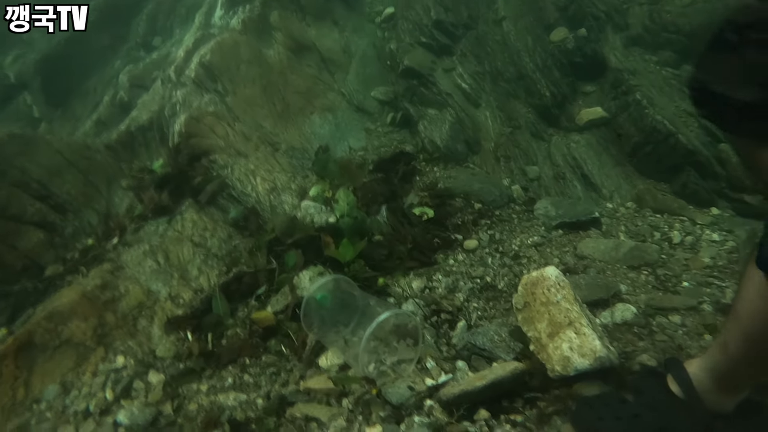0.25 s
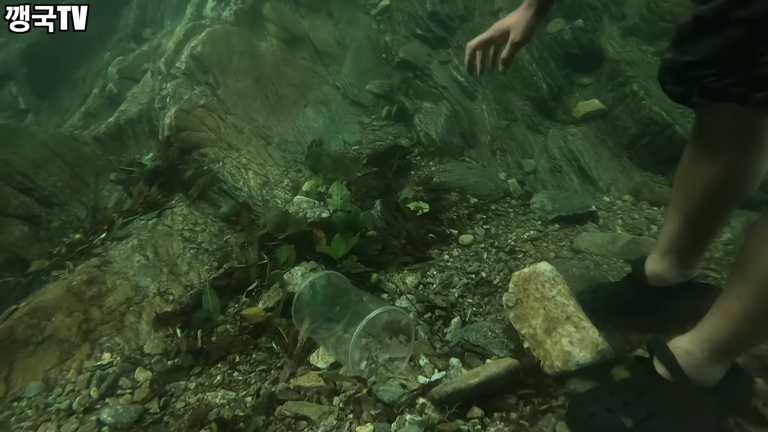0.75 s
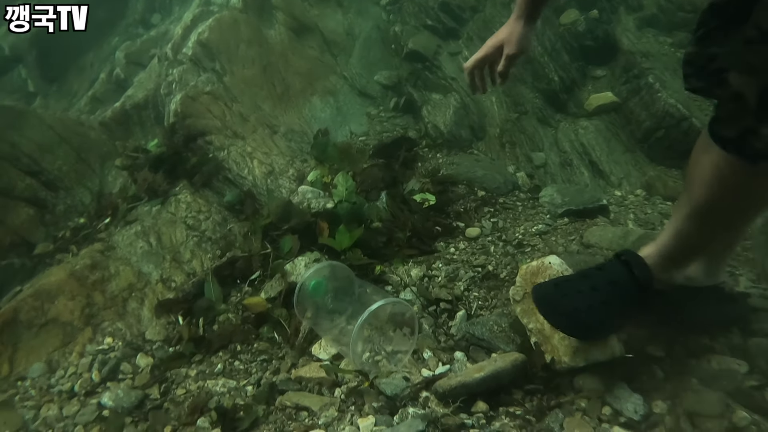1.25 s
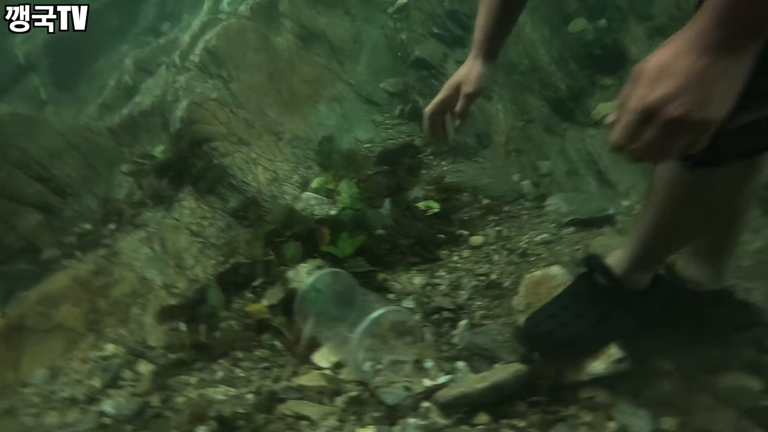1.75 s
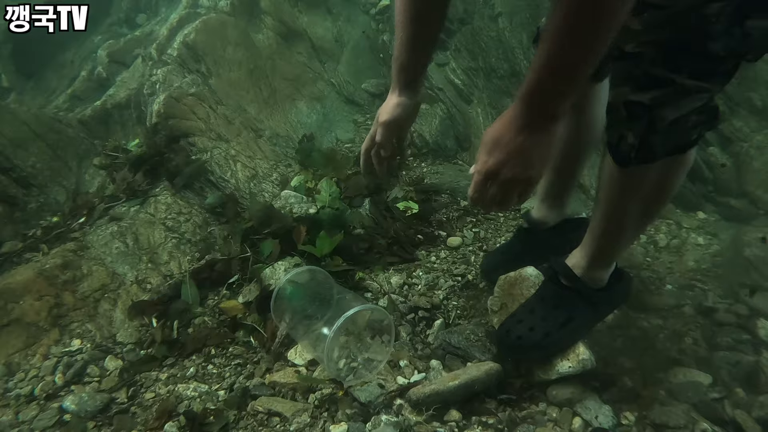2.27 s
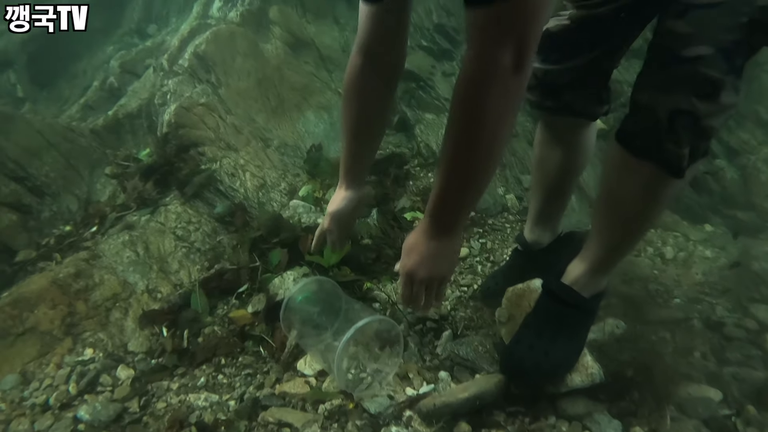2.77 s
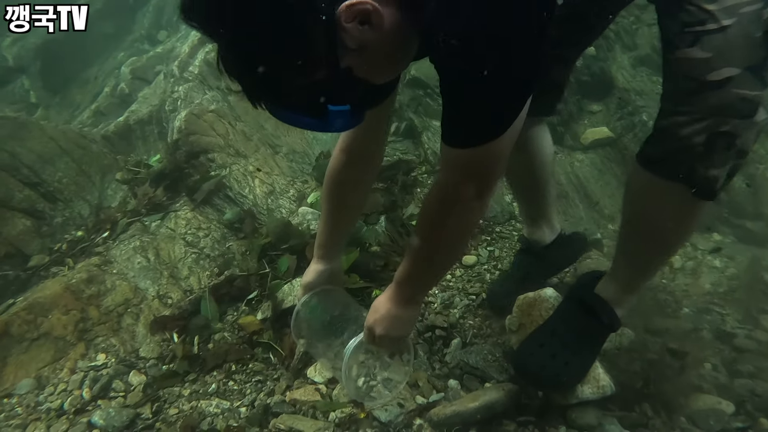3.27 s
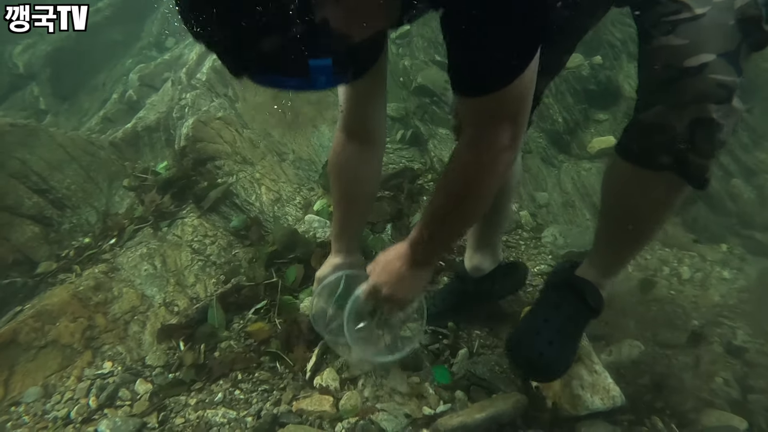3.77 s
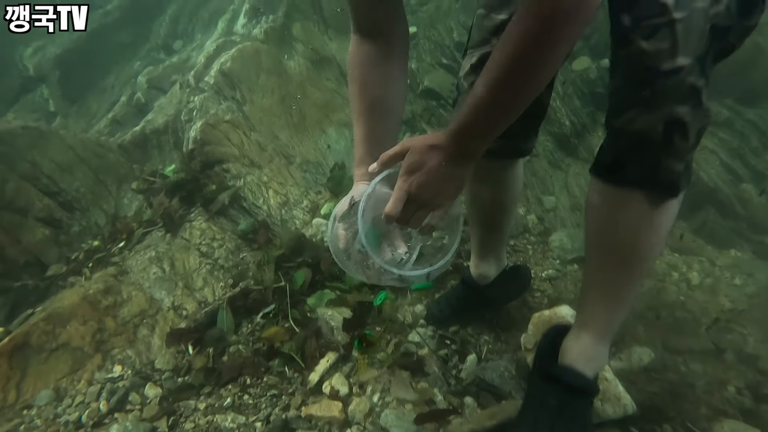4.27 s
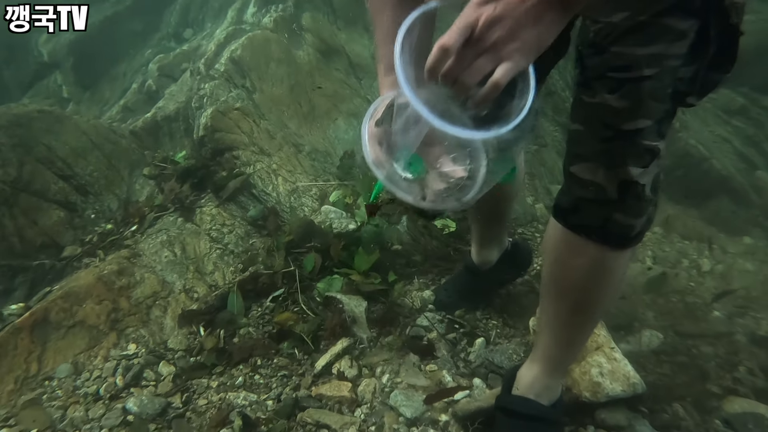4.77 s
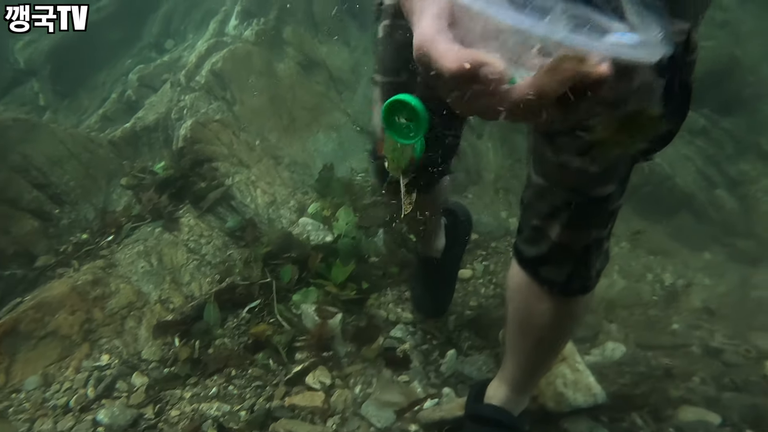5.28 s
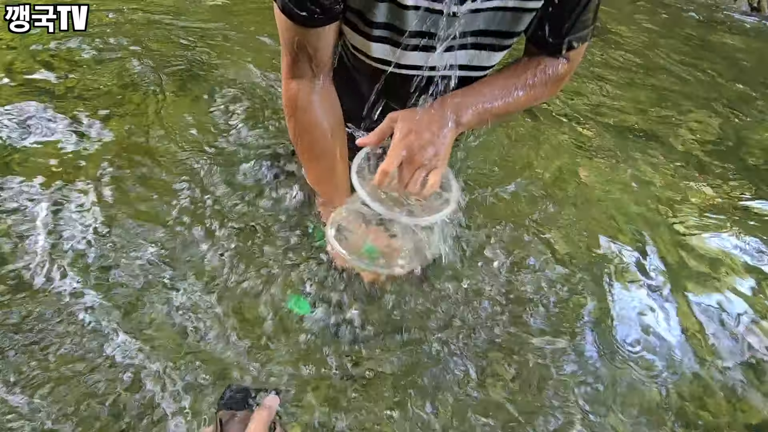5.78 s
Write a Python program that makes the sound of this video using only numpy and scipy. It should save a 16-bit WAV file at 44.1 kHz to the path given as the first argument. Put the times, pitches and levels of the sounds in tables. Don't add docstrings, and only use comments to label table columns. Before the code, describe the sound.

Muffled underwater stone clacks, gravel scrapes and low current rumble, then bubbles gush from a lifted plastic jar before an abrupt cut to bright stream rush.

```python
import sys
import numpy as np
from scipy import signal
from scipy.fft import rfft, irfft, next_fast_len
from scipy.io import wavfile
from scipy.ndimage import uniform_filter1d

SR = 44100
rng = np.random.default_rng(int(sys.argv[2]) if len(sys.argv) > 2 else 0)


def nominal_scale(level):
    x = np.asarray(level, float) / 20
    return 10 ** x


def log_audio(samples):
    frames = np.atleast_2d(samples).T
    limited = np.clip(frames, -1, 1)
    pcm = np.round(limited * 32767).astype(np.int16)
    wavfile.write(sys.argv[1], SR, pcm)


N = 265878
TIME_S = np.arange(N) / SR
SURFACE_S = 5.818


def unit(x):
    return x / np.sqrt(np.mean(x ** 2))


def butter(x, order, edge_hz, kind):
    return signal.sosfilt(signal.butter(order, edge_hz, kind, fs=SR, output="sos"), x)


def walk(rate_hz):
    k = int(SR / rate_hz)
    held = np.repeat(rng.standard_normal(N // k + 1), k)
    return unit(uniform_filter1d(uniform_filter1d(held, k), k)[:N])


def coloured(points, channels):
    size = next_fast_len(N)
    hz, db = np.transpose(points)
    gain = nominal_scale(np.interp(np.log(np.fft.rfftfreq(size, 1 / SR) + 1), np.log(hz), db))
    return unit(irfft(rfft(rng.standard_normal((channels, size))) * gain, size)[:, :N])


def case_response(hz):
    # centre_hz, width_hz, left_db, right_db
    modes = [(88.5, 40, -7.5, -13.5), (165.3, 81, -4.5, -3.5), (321.3, 205, -7, -9), (403.5, 41.3, 5.5, 3),
             (500, 77.5, -2, -3), (798, 93, -43, -9.5), (960, 27, -59.5, -44.5), (1096, 98, -46, -13.5),
             (1260, 166, -13, -14.5), (1387, 82, -22.5, -33), (1570, 92, -15, -18), (1837, 148, -43, -21.5),
             (2007, 205, -25.5, -29), (2330, 540, -35.5, -27), (2946, 236, -29.5, -51.5),
             (3413, 980, -36.5, -29.5), (4120, 110, -45.5, -33.5), (4440, 326, -27, -26.5),
             (4860, 210, -29, -23.5), (5410, 765, -27, -27), (6387, 320, -39.5, -32),
             (6945, 360, -29.5, -33), (9480, 7500, -51.5, -58), (12600, 9500, -50, -54)]
    leads = [0, .05, .1, .15, -.6, -1.2, -.3, .7, .5, 0, -.8, -2.5, -.3, -.3, .6, -.8, .1, 0, 0, 0, 0, 0, 0,
             0]
    out = 0
    for k, ((centre, width, left_db, right_db), lead) in enumerate(zip(modes, leads)):
        peak = 1 / (1 + 1j * (hz / width - centre ** 2 / (hz * width)))
        ports = np.array([nominal_scale(left_db), nominal_scale(right_db) * np.exp(-1j * lead)])
        out = out + (-1) ** k * ports[:, None] * peak * peak
    return out


def through_case(x, lo_hz, hi_hz):
    taps = 8192
    hz = np.fft.rfftfreq(taps, 1 / SR) + 1
    band_pass = signal.butter(3, [lo_hz, hi_hz], "band", fs=SR, output="sos")
    band = signal.sosfreqz(band_pass, hz, fs=SR)[1]
    ring = irfft(band * case_response(hz), taps)
    heard = signal.oaconvolve(np.atleast_2d(x), ring, axes=1)[:, :N]
    return heard / np.abs(ring.mean(axis=0)).max()


def rattles(start_s, level_db):
    length = 300
    out = np.zeros(N + length)
    fade = 0.13 * np.exp(-np.arange(length) / (0.0036 * SR))
    for s, size in zip(start_s, nominal_scale(level_db)):
        rattle = fade * rng.standard_normal(length)
        rattle[0] = 1
        out[int(s * SR):int(s * SR) + length] += size * rattle
    return out[:N]


def pockets(rows, attack_cycles, ports, rise=0.069):
    out = np.zeros((2, N + SR))
    for (s, db, hz, t60, *own_rise), port in zip(rows, ports):
        t = np.arange(int(t60 * SR)) / SR
        shape = (1 - np.exp(-t * hz / attack_cycles)) * np.exp(-np.log(1000) * t / t60)
        cycles = hz * (t + (own_rise or [rise])[0] * t ** 2 / (2 * t60))
        wave = shape / shape.max() * np.exp(2j * np.pi * cycles)
        out[:, int(s * SR):int(s * SR) + len(t)] += nominal_scale(db) * np.imag(port[:, None] * wave)
    return out[:, :N]


def sunk_pockets(rows, attack_cycles):
    ports = case_response(np.array(rows)[:, 2])
    return pockets(rows, attack_cycles, (ports / np.sqrt(np.mean(np.abs(ports) ** 2, axis=0))).T)


def swarm(t0, t1, count, lo_hz, hi_hz, db, spread_db, cycles):
    when, pitch, size, ring = rng.random((count, 4)).T
    hz = lo_hz * (hi_hz / lo_hz) ** pitch
    size_db = db - spread_db * np.log(np.maximum(size, 0.06))
    return np.transpose([t0 + (t1 - t0) * when, size_db, hz, cycles * (0.5 + ring) / hz, 0.26 * ring])


def grainy(rate_hz, spread_db, share, flicker_db, own):
    size = nominal_scale(spread_db * np.minimum(rng.exponential(size=N), 2.5))
    knocks = (rng.random(N) < rate_hz / SR) * size * np.sign(rng.standard_normal(N))
    flow = rng.standard_normal(N) + own * rng.standard_normal((2, N))
    return unit(nominal_scale(flicker_db * walk(45)) * flow) + share * unit(knocks)


def clacks():
    # start_s, bright_db, middle_db, dull_db
    knocks = [(0.0312, -52, -27, -59), (.1226, -58, -50, -62), (0.173, -70, -44, -60),
              (0.2173, -54, -29, -47), (0.2632, -64.5, -28, -59), (0.448, -60, -50, -57),
              (0.5244, -37, -40, -57), (.617, -56.5, -45, -60), (0.659, -61, -31, -62),
              (0.685, -44, -17, -53), (0.7703, -57.5, -42, -55), (3.0593, -63, -38, -65),
              (3.2109, -60, -52, -60), (3.337, -46.5, -51, -55), (3.4034, -50, -49, -60),
              (3.437, -40, -41, -53), (3.6643, -55, -28, -37), (3.72, -49, -42, -60),
              (3.7346, -39, -42, -49), (3.8972, -56, -49, -38), (3.937, -55.5, -39, -52),
              (4.2607, -48, -45, -58), (4.4785, -77, -69, -65), (4.5832, -50, -35, -43),
              (4.609, -47, -32, -46), (4.694, -57, -34, -55), (0.1457, -49.5, -46, -38),
              (0.189, -54.5, -30, -62), (0.3343, -50, -39, -47), (1.8577, -51, -63, -63),
              (2.121, -54.5, -51, -65), (3.466, -36, -29, -27), (3.5381, -28.5, -10, -47),
              (3.566, -48, -45, -31.5), (3.6241, -24.5, -4, -52), (3.6852, -43, -36, -50),
              (3.7727, -22, 0.5, -54), (3.819, -38.5, -57, -68), (4.188, -38.5, -17, -31.5),
              (4.1962, -41.5, -22, -57), (4.2868, -76, -42, -30), (4.502, -57, -24, -54),
              (4.6412, -51, -18, -31), (4.8668, -46, -25, -31.5), (5.195, -52, -43, -53),
              (5.2289, -47, -39, -21.5), (5.464, -48, -26, -33), (5.5039, -56, -18, -32),
              (5.6462, -57, -16, -36)]
    start_s, bright_db, middle_db, dull_db = np.transpose(knocks)
    crack, middle, dull = np.zeros((3, N))
    at = (start_s * SR).astype(int)
    crack[at], middle[at], dull[at] = nominal_scale(bright_db), nominal_scale(middle_db), nominal_scale(dull_db)
    out = nominal_scale(10.5) * through_case(rattles(start_s, bright_db), 2490, 9040)
    out = out + nominal_scale(8.5) * through_case(crack, 4060, 5580)
    out = out + nominal_scale(-28.5) * through_case(middle, 1450, 1770)
    out = out + nominal_scale(-11) * through_case(middle, 2220, 4390)
    return out + nominal_scale(4) * through_case(dull, 398, 2000)


def slaps():
    # start_s, peak_db, length_s
    pushes = [(0.145, -13, 0.0051), (0.566, -31, 0.00098), (0.873, -19, 0.0021), (1.396, -22, 0.0033),
              (1.901, -25.5, 0.0027), (2.918, -38, 0.0014), (3.072, -45, 0.00089), (4.285, -17, 0.0024),
              (5.233, -8, 0.003), (5.281, -11.5, 0.0018), (5.298, -11.5, 0.0025), (5.322, -15.5, 0.0022),
              (5.398, -17, 0.0056), (5.463, -17.5, 0.0055), (5.532, -18, 0.0042), (5.69, -12.5, 0.0015),
              (5.7376, -8.5, 0.0027)]
    push = np.zeros(N)
    for s, db, length in pushes:
        bump = np.hanning(int(length * SR) + 3)
        push[int(s * SR):int(s * SR) + len(bump)] += nominal_scale(db) * bump
    return butter(push, 1, 60, "high") + nominal_scale(-45) * through_case(push, 29, 680)


def large_bubbles():
    # start_s, peak_db, pitch_hz, t60_s
    gulps = [(0.141, -26.5, 397, 0.15), (0.487, -20.5, 143, 0.058), (0.56, -11.5, 159, 0.026),
             (1.621, -29, 226, 0.03), (2.389, -23.5, 415, 0.054), (2.813, -30.5, 407, 0.19),
             (2.877, -22.5, 318, 0.04), (3.07, -20, 387, 0.028), (3.336, -27, 153, 0.067),
             (3.375, -21.5, 452, 0.044), (3.423, -19, 164, 0.26), (3.509, -18.5, 140, 0.056),
             (3.551, -27, 138, 0.09), (4.173, -25.5, 422, 0.12), (4.237, -23, 393, 0.093),
             (4.36, -26.5, 540, 0.14), (4.916, -24.5, 401, 0.14), (5.104, -19, 367, 0.013),
             (5.583, -36, 407, 0.14)]
    # start_s, peak_db, pitch_hz, t60_s, rise (0-1)
    glugs = [
        (.908, -25, 415, 0.19, 0),
        (5.232, -7, 1110, 0.013, 0),
        (5.24, -25, 930, 0.087, 0),
        (5.278, -22.5, 930, 0.096, 0.33),
        (5.299, -20.5, 800, 0.17, 0.07),
        (5.352, -18.5, 780, 0.22, 0.3),
        (5.4, -30, 844, 0.12, 0.1),
        (5.691, -14, 786, 0.065, 0.15),
        (5.737, -7.5, 442, 0.026, 0.28),
        (5.745, -12.5, 492, 0.226, 0.58),
    ]
    return sunk_pockets(gulps, 0.93) + sunk_pockets(glugs, 0.99)


def spill():
    rows = swarm(5.05, 5.74, count=300, lo_hz=1500, hi_hz=7000, db=-55, spread_db=3, cycles=16)
    rows[:, 1] += 0.1 - 1.2 * np.log2(rows[:, 2] / 3000)
    return sunk_pockets(rows, 2.1)


def gush():
    rows = swarm(4.9, 5.73, count=190, lo_hz=900, hi_hz=2400, db=-47, spread_db=3, cycles=40)
    rows[:, 1] += 15 * (rows[:, 0] - 5.5)
    return sunk_pockets(rows, 2.5)


def middle_bubbles():
    # start_s, peak_db, pitch_hz
    rows = [(0.687, -34, 1570), (0.992, -43.5, 2110), (1.893, -31.5, 1590), (1.895, -46, 897),
            (2.15, -44.5, 1570), (2.82, -39.5, 1365), (3.507, -30, 2270), (2.351, -51, 1296),
            (2.375, -56, 1210), (2.829, -48, 1580), (3.172, -47, 1240), (4.012, -56, 1300),
            (4.029, -49, 1245), (4.131, -42, 1400), (4.16, -35.5, 1300), (4.338, -46, 1270),
            (4.362, -56, 1250), (4.234, -31.5, 1340), (4.609, -29, 820), (4.772, -25, 1127),
            (4.801, -32, 2200), (4.947, -29.5, 1055), (5.056, -32.5, 2400), (5.081, -27, 1056),
            (5.133, -37, 1270), (5.159, -27, 1120), (5.463, -28, 1410), (5.503, -22.5, 1570),
            (5.516, -27.5, 1257), (5.566, -27.5, 1250), (5.645, -22, 1407), (5.666, -19.5, 1130),
            (5.665, -20, 1390), (5.712, -21, 1166), (5.734, -20.5, 1455), (5.746, -27.5, 1320),
            (5.763, -31.5, 1533)]
    # start_s, peak_db, pitch_hz, t60_s
    drops = [(.7399, -42, 1600, 0.018), (.7713, -42, 1850, 0.031), (.836, -40.5, 1580, 0.024),
             (.9464, -46, 1570, .025), (.9688, -43, 2020, 0.014), (1.7416, -50, 2080, 0.019),
             (1.7535, -47, 2240, .015), (2.415, -43.5, 1280, .03), (2.45, -37.5, 790, 0.042),
             (2.566, -46, 1580, 0.018), (2.646, -45, 1260, 0.04), (2.674, -41.5, 1230, 0.014),
             (2.819, -49, 2170, 0.014), (2.917, -41.5, 1050, 0.047), (2.981, -50, 1260, 0.017),
             (4.095, -33.5, 1350, 0.057), (4.165, -42, 2300, 0.078), (4.184, -35, 2130, 0.033),
             (4.19, -37, 3130, 0.036), (4.187, -34.5, 1330, 0.024), (4.522, -56, 1200, 0.013),
             (4.593, -51, 1240, 0.03), (4.867, -38, 1254, 0.048), (5.037, -38, 2240, 0.034),
             (5.056, -36, 3030, 0.015), (5.095, -34, 1310, 0.027), (5.133, -34, 2190, 0.031),
             (5.176, -30, 1313, 0.058), (5.206, -23, 2270, 0.028), (5.254, -38, 2080, 0.021),
             (5.322, -35, 1290, 0.073), (5.345, -38, 2420, 0.031), (5.353, -51, 1610, .05),
             (5.384, -28, 1735, 0.036), (5.397, -19, 1280, 0.035), (5.424, -28, 1100, 0.046),
             (5.428, -39, 1610, 0.07), (5.585, -38, 1930, 0.05), (5.6, -40, 2540, 0.029),
             (5.615, -34, 1450, 0.03), (5.629, -32, 1193, 0.028), (5.655, -37, 2040, 0.028),
             (5.675, -26.5, 2180, 0.022), (5.684, -19, 1620, 0.017), (5.7, -26, 1740, 0.043),
             (5.705, -43, 2250, 0.028), (5.722, -26, 1910, 0.037)]
    ringing = [(s, db, hz, 71 / hz) for s, db, hz in rows]
    return sunk_pockets(ringing, 1.5) + sunk_pockets(drops, 1.4)


def fizz():
    # start_s, peak_db, pitch_hz
    rows = [(.9249, -46, 4910), (1.0893, -50, 4690), (1.6716, -47, 4500), (1.678, -51.5, 3080),
            (1.7416, -49, 4780), (1.8189, -50, 4460), (.303, -59, 6880), (.402, -53, 6600),
            (4.407, -55, 7100), (4.4785, -67, 5430), (4.92, -42, 7000), (4.958, -47, 6060),
            (5.0448, -41, 4300), (5.0757, -41, 5400), (5.1751, -40, 5300), (5.185, -38, 5470),
            (5.2519, -50, 3660), (5.33, -50, 6700), (5.339, -55, 8940), (5.37, -55, 5770),
            (5.405, -46, 6160), (5.409, -57, 8100), (5.478, -46, 4400), (5.51, -49, 5470),
            (5.547, -49, 5900), (5.558, -44, 3240), (5.595, -41, 5800), (5.653, -46, 7050),
            (5.66, -39, 2720), (5.67, -41, 3180), (5.672, -49, 7000), (5.695, -48, 7600),
            (5.704, -40, 3700), (5.72, -45, 5140), (5.7827, -62, 3020), (5.803, -54, 7300),
            (.819, -34, 4550), (1.117, -48, 2820), (1.6433, -44, 4630), (1.709, -52, 4314),
            (1.7818, -50, 4940), (2.65, -44, 4640), (4.1512, -36, 4500), (4.328, -37.5, 5230),
            (4.9097, -35.5, 4600), (4.944, -40, 6170), (5.0053, -37, 5360), (5.176, -40, 3140),
            (5.2914, -41.5, 5700), (5.3138, -43, 5450), (5.3393, -41, 3300), (5.356, -34, 4600),
            (5.3849, -29, 4110), (5.4166, -39, 4730), (5.441, -34.5, 2740), (5.464, -28, 3720),
            (5.5827, -30.5, 6120), (5.593, -40.5, 4280), (5.6167, -39, 4800), (5.646, -36.5, 4740)]
    t60_s, rise, tick_db = 0.012, 0.081, -11.5
    start_s, peak_db, _ = np.transpose(rows)
    tick = through_case(rattles(start_s, peak_db + tick_db), 3600, 7500)
    return sunk_pockets([(*row, t60_s, rise) for row in rows], 1.8) + tick


def small_bubbles():
    bubbles = (middle_bubbles() + fizz() + gush()) * nominal_scale(1.3 * walk(110))
    return bubbles + nominal_scale(-43) * through_case(bubbles.mean(axis=0), 780, 3000)


def surges(rows, roundness):
    slope_db = 15
    t = np.arange(0, N, 32) / SR
    power = 0
    for s, db, rise, fall in rows:
        distance = np.where(t < s, (s - t) / rise, np.abs((t - s) / fall) ** roundness)
        power = power + nominal_scale(db - slope_db * distance) ** 2
    return np.interp(TIME_S, t, power)


def stirring():
    # crest_s, slosh_db, rise_s, fall_s
    limbs = [(.162, -29.5, 0.48, 0.22), (.45, -39, 0.15, .11), (.576, -24, 0.058, 0.02),
             (.681, -28, 0.061, 0.079), (.861, -31, 0.032, 0.16), (1.48, -43.5, 0.16, 0.77),
             (1.903, -35, 0.035, 0.031), (2.257, -56.5, 0.29, 0.13), (2.427, -34.5, 0.068, 0.93),
             (2.542, -29.5, 0.27, 0.055), (2.846, -44, 0.022, 1), (3.0, -36, 0.24, 0.026),
             (3.215, -33.5, 0.12, 0.021), (3.44, -28.5, 0.096, 0.3), (3.51, -18.5, 0.14, 0.039),
             (3.72, -38, 0.064, 0.099), (3.83, -40, 0.023, 1), (4.053, -30.5, 0.53, 0.052),
             (4.208, -37, 0.035, 0.16), (4.373, -32.5, 0.061, 0.05), (4.612, -22, 0.084, 0.13),
             (4.732, -28, 0.11, 0.71), (5.131, -29.5, 0.3, 0.54), (5.29, -32, 0.035, 0.6),
             (5.69, -27.5, 0.049, 0.03), (5.754, -20, 0.041, 0.018)]
    # crest_s, gurgle_db, rise_s, fall_s
    freed_air = [(0.0, -50.5, .1, 0.51), (.75, -55.5, 0.073, 0.57), (2.36, -54, .02, 0.43),
                 (2.83, -51, 0.13, 0.19), (4.19, -43.5, 0.065, 0.19), (4.506, -37.5, 0.0043, 0.18),
                 (4.612, -29.5, 0.06, 0.018), (5.19, -42.5, 0.21, 0.11), (5.355, -38, 0.038, 0.14),
                 (5.69, -34, 0.095, 0.1), (5.77, -43, 0.085, 0.14)]
    # crest_s, grit_db, rise_s, fall_s
    soles = [(0.0, -49.5, .1, 0.3), (.11, -55, 0.12, 0.12), (.55, -40.5, .03, .05), (.45, -53, 0.03, 0.25),
             (.512, -36, 0.014, 0.059), (.681, -43, 0.014, 0.04), (.73, -45, 0.1, 0.03),
             (.82, -54.5, 0.14, 0.42), (1.439, -53, 0.032, 0.34), (1.826, -50.5, 0.021, 0.13),
             (2.257, -62, 0.27, 0.19), (2.355, -53.5, 0.023, 0.54), (2.83, -59.5, 0.19, 0.48),
             (3.085, -54, 0.04, 0.18), (3.31, -47, 0.011, 1), (3.5, -41.5, 0.15, 0.33),
             (3.718, -41, 0.0048, 0.032), (3.75, -41.5, 0.034, 0.043), (3.8, -54.5, 0.15, 0.42),
             (4.19, -46.5, 0.019, 0.19), (4.506, -48, 0.0043, 0.44), (4.612, -43, 0.078, 0.023),
             (4.8, -61, 0.29, 0.86), (5.131, -49, 0.83, 0.074), (5.355, -54.5, 0.045, 0.25),
             (5.68, -54.5, 0.26, 0.21)]
    sweeps = surges(limbs, 0.73)
    froth = nominal_scale(-22) ** 2 * sweeps + surges(freed_air, 1)
    scuffs = surges(soles, 0.85)
    slosh_gain = np.sqrt(sweeps + nominal_scale(-47) ** 2)
    gurgle_gain = np.sqrt(froth + nominal_scale(-63.5) ** 2)
    grit_gain = np.sqrt(scuffs + nominal_scale(-85.5) ** 2)
    return slosh_gain, gurgle_gain, grit_gain, np.sqrt(froth)


def slosh(gain):
    swirl = grainy(90, 2.7, 0.59, 3.18, 0.11)
    direct = butter(swirl.mean(axis=0), 6, [200, 565], "band")
    return gain * (unit(through_case(swirl, 97, 493)) + nominal_scale(-16) * unit(direct))


def gurgle(gain, churn_gain):
    wet = grainy(220, 8.5, 0.86, 5.6, 0.26)
    wash = unit(through_case(wet, 1070, 2850))
    rows = swarm(0, 5.8, count=1660, lo_hz=938, hi_hz=1783, db=0, spread_db=4.5, cycles=25)
    crowd = unit(sunk_pockets(rows, 0.2))
    airy = np.interp(TIME_S, [5.0, 5.25], [0.4, 0.8])
    churn = nominal_scale(-1) * churn_gain * unit(through_case(wet, 569, 974))
    return gain * (np.sqrt(1 - airy ** 2) * wash + airy * crowd) + churn


def grit_and_spray(grit_gain, gurgle_gain):
    scuff = grainy(450, 3.5, 0.8, 3.2, 0.1)
    rows = swarm(0, 4.4, count=700, lo_hz=2300, hi_hz=6200, db=0, spread_db=4.5, cycles=26)
    grit = unit(through_case(scuff, 1860, 10030)) + 0.2 * unit(sunk_pockets(rows, 2.5))
    grit = grit + 0.21 * unit(through_case(scuff ** 3, 4220, 5560))
    spray_gain = nominal_scale(np.interp(TIME_S, [3.3, 4.2], [-20, -11])) * gurgle_gain
    return grit_gain * grit + spray_gain * unit(through_case(scuff, 1670, 4820))


def current():
    # edge_hz, density_db
    spectrum = [(4.7, -44.5), (8.0, 0), (21, 7), (32, -11), (50, -6), (85, -24), (110, -26), (140, -53.5),
                (240, -120)]
    # time_s, rumble_db
    swell = [(0.0, -23), (0.06, -34.5), (1.9, -26), (2.07, -37), (2.16, -27.5), (2.24, -34.5), (2.37, -27),
             (2.45, -37), (2.5, -30), (3.23, -39.5), (3.42, -30), (4.2, -38), (4.51, -31), (4.64, -37),
             (5.41, -25), (5.67, -34), (5.74, -23.5), (5.8, -46)]
    rumble = nominal_scale(np.interp(TIME_S, *np.transpose(swell)))
    return rumble * coloured(spectrum, channels=1) * np.array([[0.97], [1.03]])


def under_water():
    slosh_gain, gurgle_gain, grit_gain, churn_gain = stirring()
    events = clacks() + slaps() + large_bubbles() + spill() + small_bubbles()
    stirred = slosh(slosh_gain) + gurgle(gurgle_gain, churn_gain) + grit_and_spray(grit_gain, gurgle_gain)
    return events + stirred + current()


def open_air():
    # edge_hz, density_db
    spectrum = [(24, -86), (40, -36), (193, -7), (344, -59), (390, 4), (500, -12), (627, 0), (766, -9),
                (1430, -6.5), (2670, -15.5), (15800, -24)]
    # start_s, peak_db, pitch_hz
    plinks = [
        (5.844, -29, 1990),
        (5.869, -31, 3500),
        (5.949, -32, 2420),
        (5.985, -30, 2140),
        (6.013, -35, 1720),
    ]
    mid, side = coloured(spectrum, channels=2)
    side = butter(side, 1, 350, "high")
    hiss = mid + side * np.array([[1], [-1]])
    rows = swarm(SURFACE_S, N / SR, count=120, lo_hz=239, hi_hz=4370, db=-8, spread_db=4.5, cycles=8.9)
    angle = rng.random(len(rows)) * np.pi / 2
    bubbles = pockets(rows, 1, np.transpose([np.cos(angle), np.sin(angle)]))
    drops = [(s, db, hz, 99 / hz) for s, db, hz in plinks]
    near = pockets(drops, 2, np.ones((len(drops), 2)))
    return nominal_scale(-31.5) * (0.94 * hiss + 1.26 * bubbles) + near


def scene():
    air = np.clip((TIME_S - SURFACE_S) / 0.0008, 0, 1)
    return (1 - air) * under_water() + air * open_air()


def top_cut(x):
    return signal.sosfilt(signal.butter(12, 16940, fs=SR, output="sos"), x)


def record(dry):
    # edge_hz, threshold_db
    gates = [(8500, -91.5), (10700, -86.5)]
    mix = signal.sosfilt(signal.ellip(8, 0.2, 70, 15830, fs=SR, output="sos"), dry)
    for hz, db in gates:
        top = signal.sosfiltfilt(signal.butter(12, hz, "high", fs=SR, output="sos"), mix)
        power = uniform_filter1d(top ** 2, size=512) / nominal_scale(db) ** 2
        mix = mix - top / (1 + power ** 3)
    return top_cut(mix)


dry = scene()
out = record(dry)
log_audio(out)
```